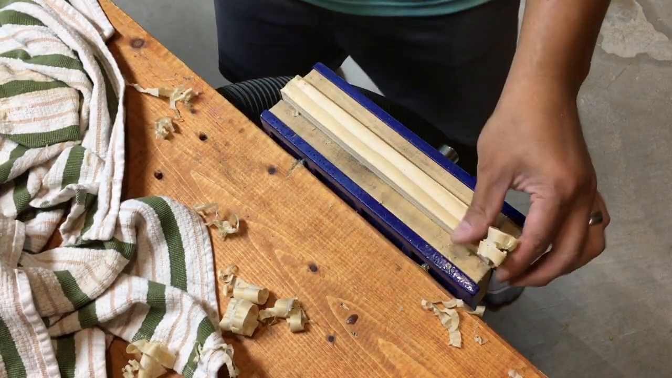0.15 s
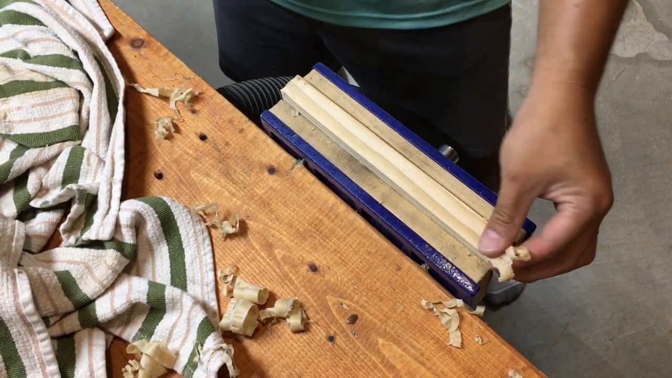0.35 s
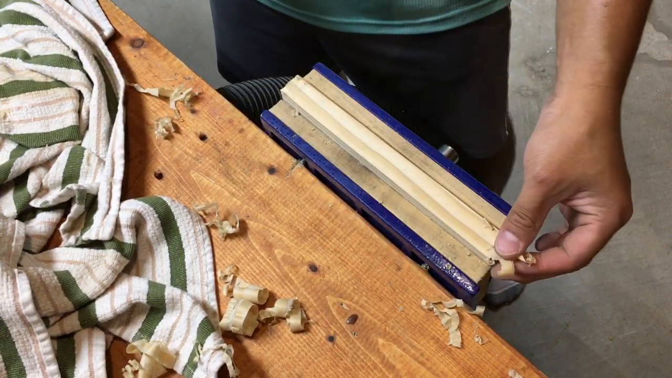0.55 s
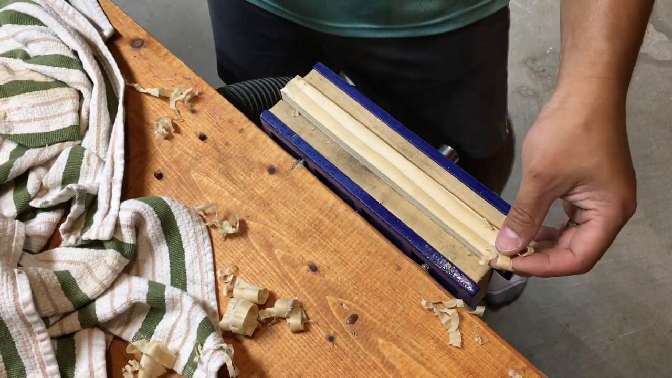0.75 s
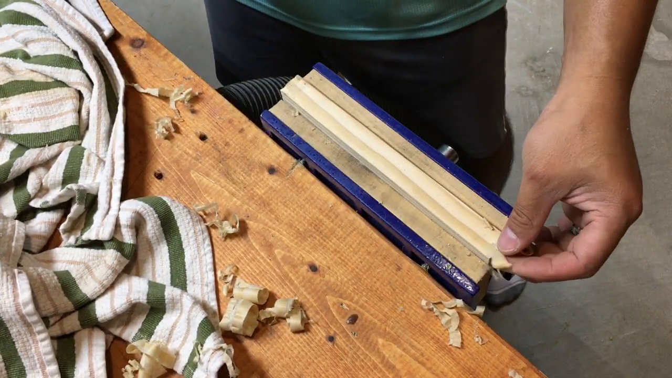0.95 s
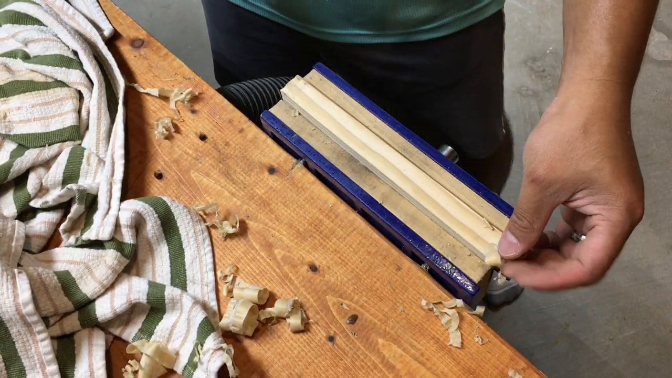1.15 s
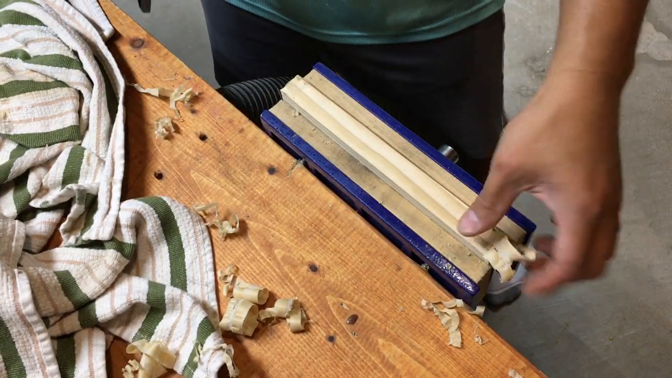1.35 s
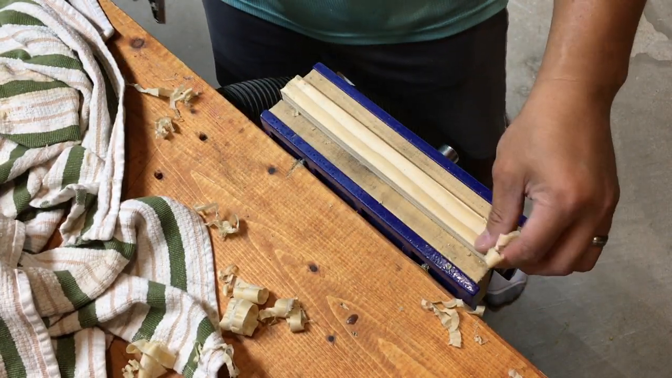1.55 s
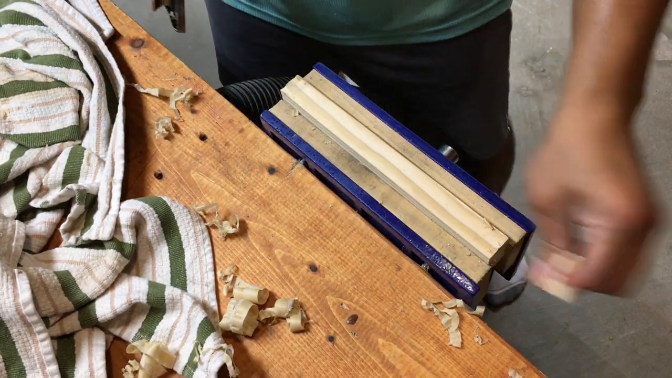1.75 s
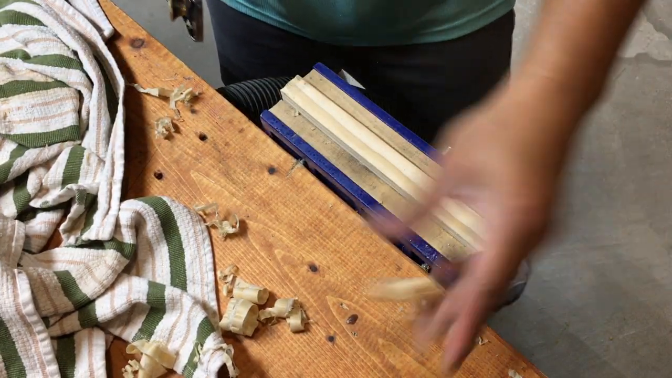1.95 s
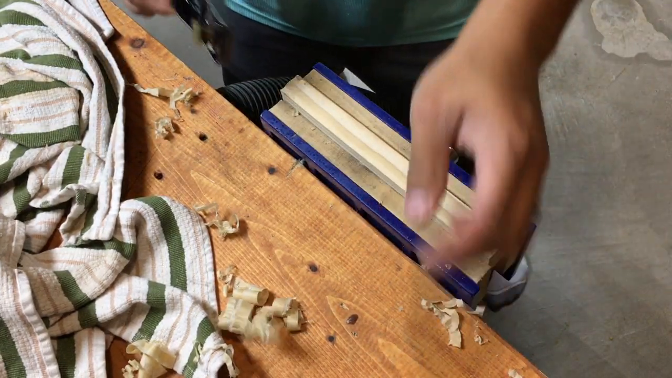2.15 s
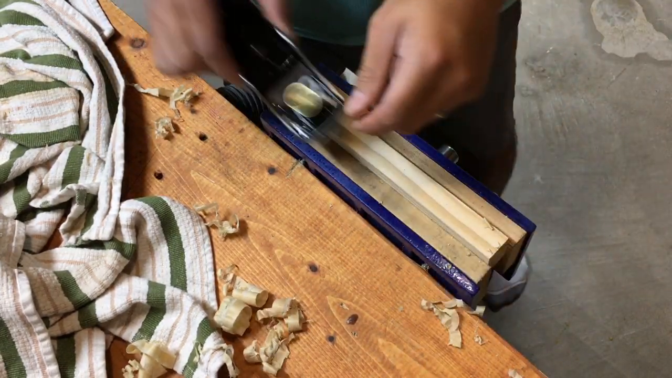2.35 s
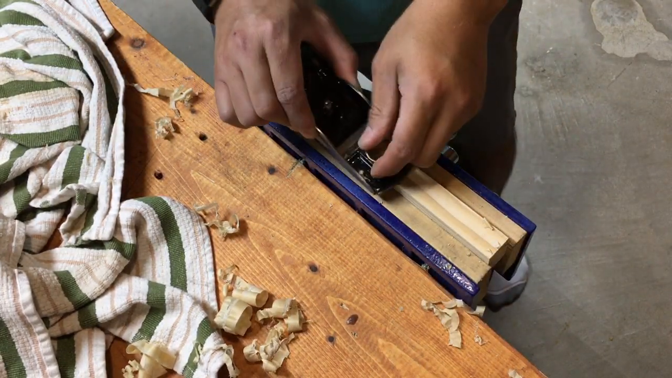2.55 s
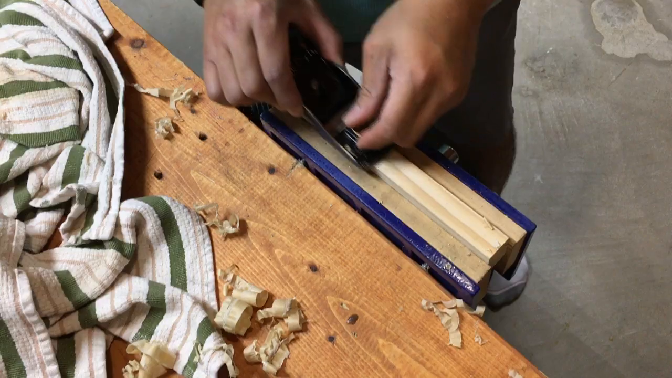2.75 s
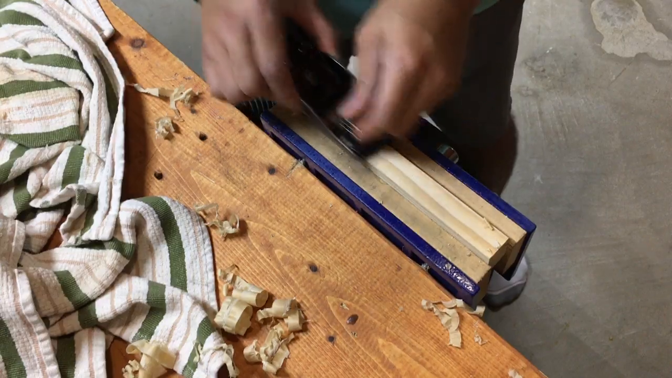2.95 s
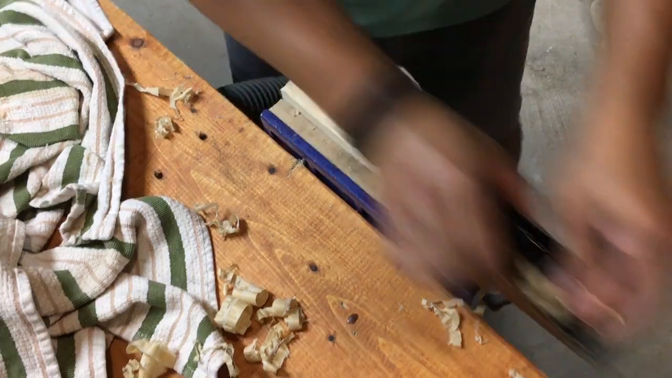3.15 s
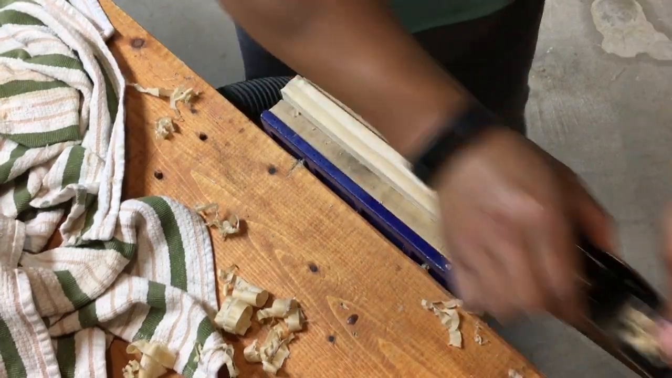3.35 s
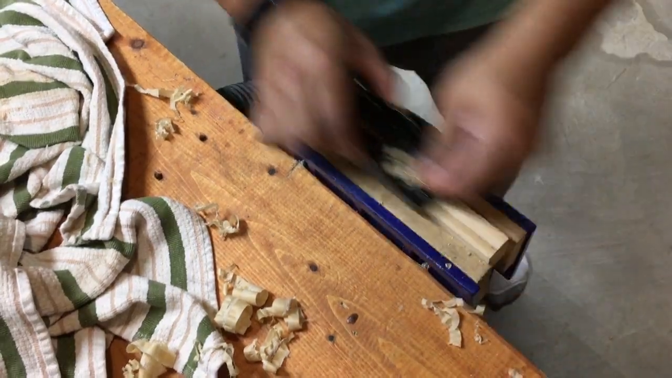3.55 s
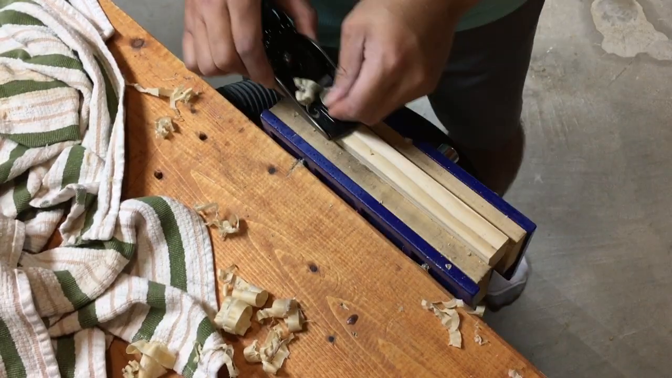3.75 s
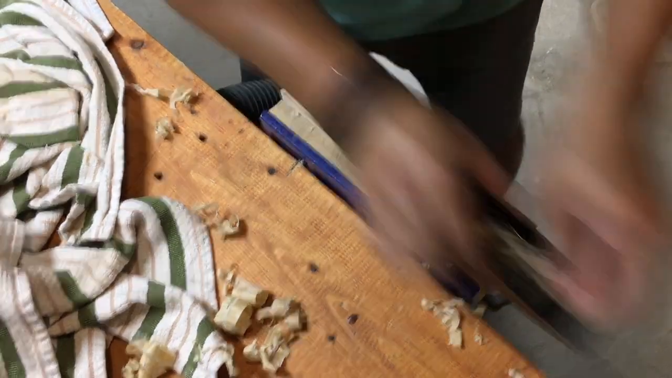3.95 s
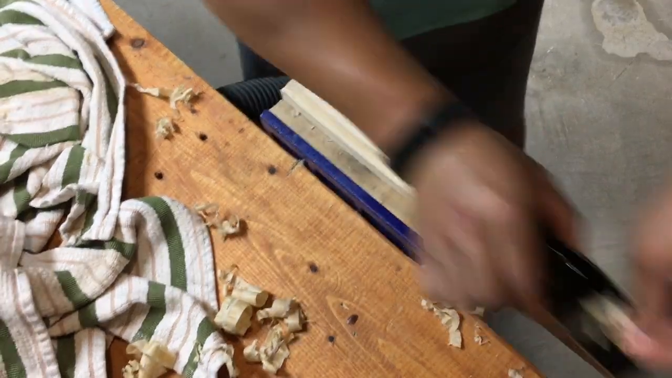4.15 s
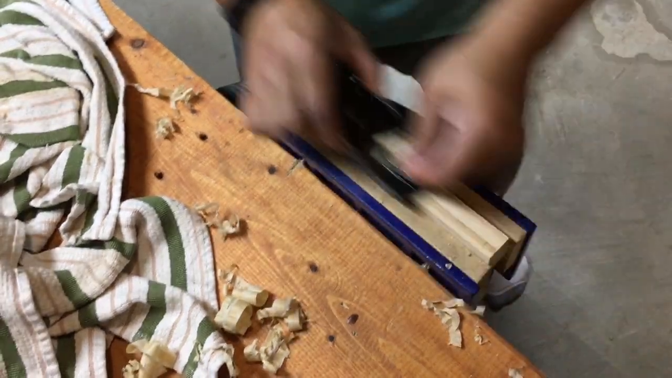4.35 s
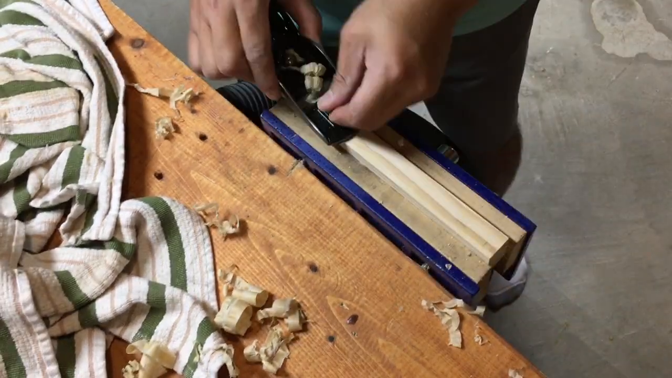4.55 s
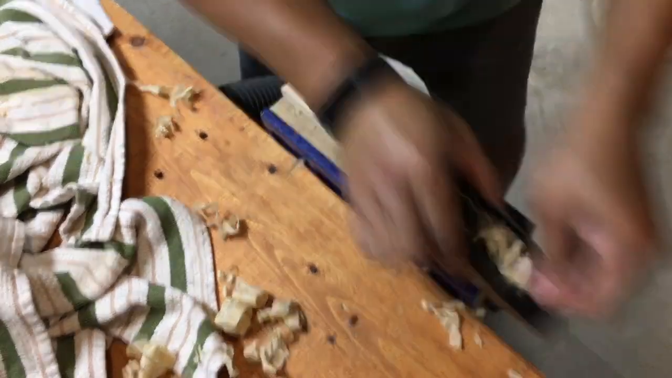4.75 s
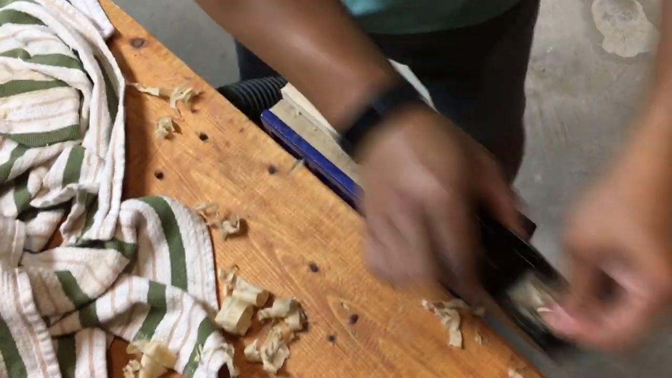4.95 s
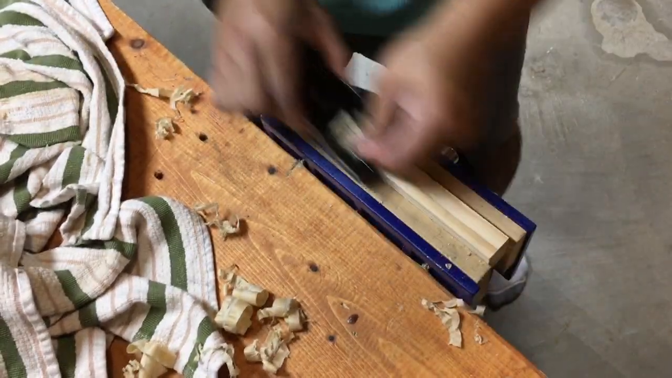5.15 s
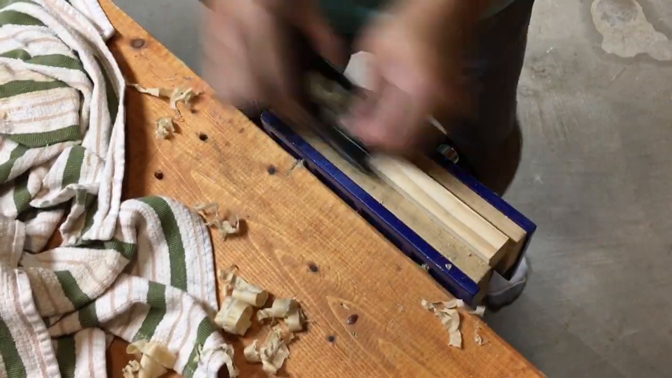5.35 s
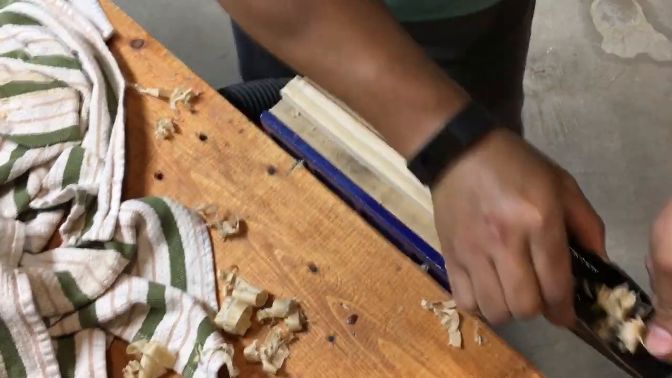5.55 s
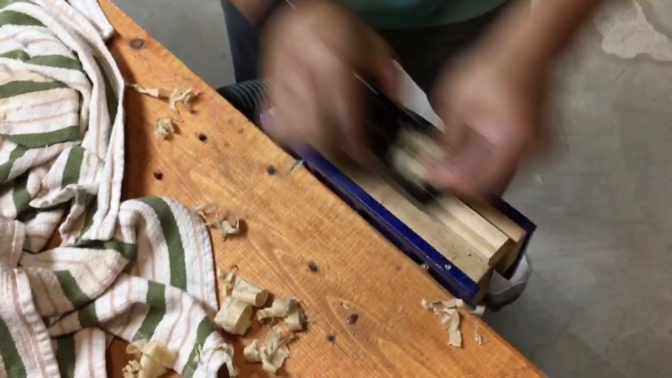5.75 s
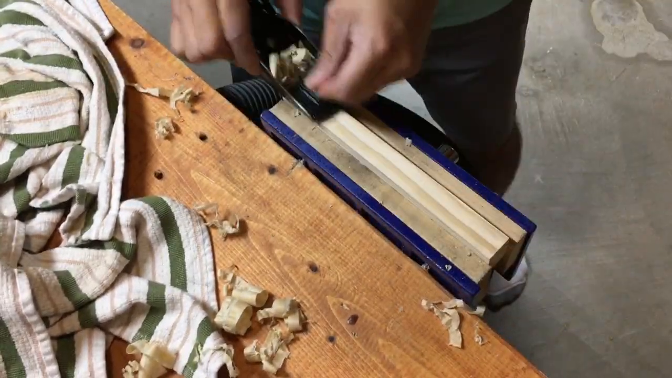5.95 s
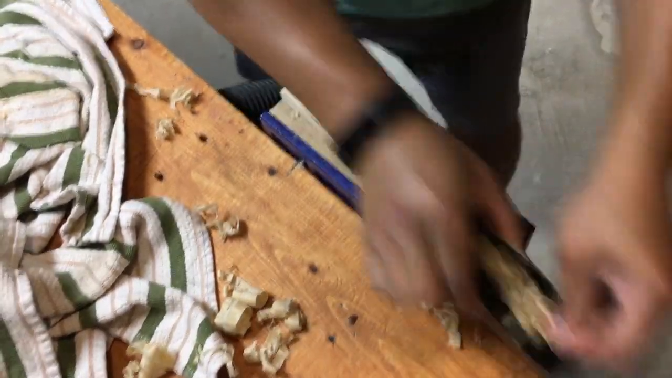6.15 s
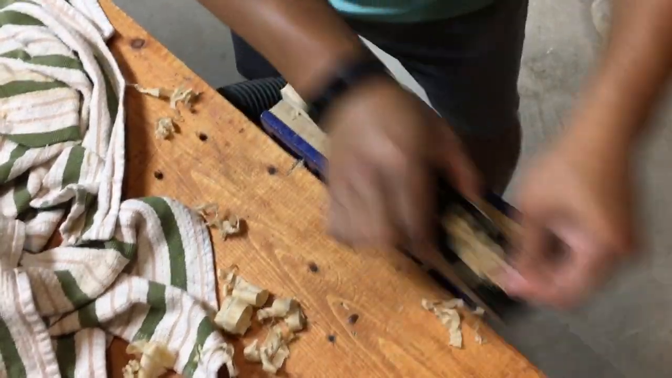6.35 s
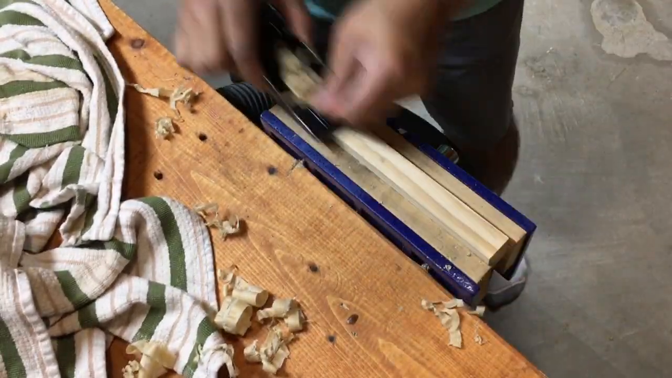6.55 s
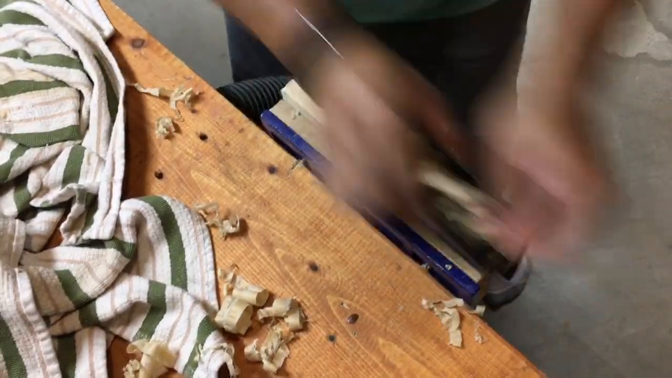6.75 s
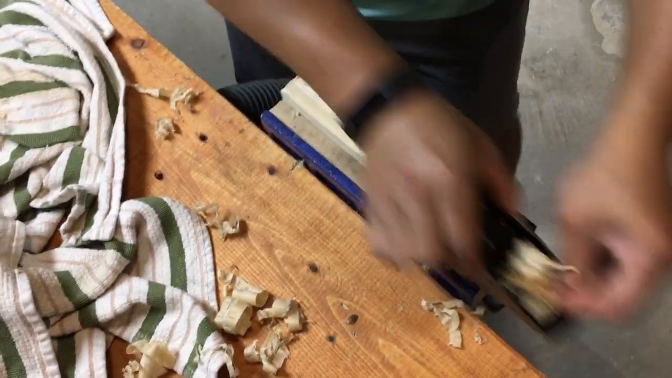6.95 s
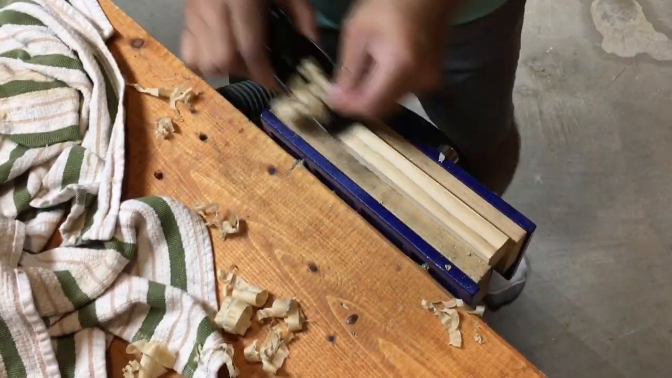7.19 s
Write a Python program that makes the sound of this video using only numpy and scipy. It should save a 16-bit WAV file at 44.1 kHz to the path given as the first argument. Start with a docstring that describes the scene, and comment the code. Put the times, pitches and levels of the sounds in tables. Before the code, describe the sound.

Fingers faintly rustle a dry wood shaving, then a metal hand plane clacks down and rasps along thin wooden strips in six quick pushes.

```python
"""Shaving and planing thin wooden strips

Fingers tease a shaving off thin wooden strips; then a metal hand plane is set down and pushed along them six times.
Rubbing and tearing are streams of random tiny fractures, coloured by the wood and the hollow throat of the plane.
Landings and run-offs ring decaying sine modes of the jig and the workbench; hard contacts crack and ring the iron.
Dense reflections of a small workshop and low, quiet air noise surround it, the same in both channels."""
import sys
import numpy as np
from scipy import signal
from scipy.fft import rfft, irfft
from scipy.io import wavfile
from scipy.ndimage import map_coordinates

SR = 44100
rng = np.random.default_rng(int(sys.argv[2]) if len(sys.argv) > 2 else 0)


def master(y):
    """Save y as 16-bit WAV."""
    cut = np.clip(np.atleast_2d(y).T, -1, 1)
    pcm = np.round(cut * 32767)  # scale
    wavfile.write(sys.argv[1], SR, pcm.astype(np.int16))


N = 318402
TIME = np.arange(N) / SR

# forward pushes: (start [s], run-off [s], time to gather speed [s], level [dB], shaking of the jig [dB])
PUSHES = [(3.002, 3.319, 0.079, -40.5, -45), (3.831, 4.065, 0.2, -31.5, -36),
          (4.642, 4.861, 0.17, -33.5, -34.5), (5.383, 5.566, 0.046, -35.5, -41),
          (6.035, 6.235, 0.067, -31, -37), (6.708, 6.893, 0.34, -26, -27)]
# the sole slides back over the strips: (start [s], turn [s], time to gather speed [s], level [dB],
# swell from start to end [dB], shaking of the jig [dB])
RETURNS = [(2.718, 2.966, 0.06, -59.5, 4, -49.5), (3.624, 3.832, 0.012, -47, -22, -41),
           (4.42, 4.614, 0.012, -48.5, -7, -42), (5.075, 5.375, 0.028, -47.5, 2.5, -39.5),
           (5.765, 6.027, 0.01, -41.5, -13.5, -41), (6.343, 6.713, 0.21, -44, -1, -40.5),
           (7.056, 7.301, 0.056, -38, 2.5, -47.5)]
RUN_OFF_S, TURN_S = 0.0037, 0.046  # a push ends at once; a return slows down to the turn
# resonances of the plane and its throat: (frequency [Hz], width [Hz], relative level [dB])
THROAT = [(3270, 500, 13.5), (4480, 450, 12), (6500, 500, 6.5), (8600, 900, 1), (11250, 650, 1.5),
          (13300, 600, -1)]
# spectrum of the jig: (frequency [Hz], level [dB])
JIG_COLOUR = [(110, -2), (165, -6), (205, -2), (245, 1), (350, -1.5), (470, -10.5), (650, -15.5),
              (900, -20.5), (1800, -51)]
# modes of the jig: (frequency [Hz], relative level [dB], t60 [s])
JIG_MODES = [(163.4, -8.5, 0.25), (240.8, -1, 0.13), (257.2, -2.5, 0.14), (309.8, -10, 0.32),
             (361.1, -7.5, 0.15), (421.3, -18, 0.14), (579, -18.5, 0.15), (666.6, -16, 0.12)]


def amp(db):
    """Decibels to gain."""
    return 10 ** (np.asarray(db) / 20)


def evened(x):
    """Scales to rms 1."""
    return x / np.sqrt(np.mean(x ** 2) + 1e-20)


def read(points, hz):
    """Reads a table on a log-frequency axis."""
    f, value = np.transpose(points)
    return np.interp(np.log(hz + 1), np.log(f + 1), value)


def add(mix, s, sound):
    """Mixes a sound in at s seconds."""
    part = mix[max(round(s * SR), 0):][:len(sound)]
    part += sound[:len(part)]


def bins(x):
    """The frequencies in a sound's spectrum."""
    return np.fft.rfftfreq(len(x), 1 / SR)


def coloured(x, points, gain=1):
    """Gives a sound a spectrum, times any further gain, at rms 1."""
    spectrum = rfft(x) * amp(read(points, bins(x))) * gain
    return evened(irfft(spectrum, len(x)))


def humps(hz, peaks, widen=1):
    """Power response of a few resonances; damping widens them."""
    power = 0
    for f, width, db in peaks:
        detune = 2 * (hz - f) / (width * widen)
        power = power + amp(db) ** 2 / (1 + detune ** 2) ** 2
    return power


def tilt(hz, slope_db):
    """Gain that slopes by so many dB an octave around 5 kHz, flat below 800 Hz."""
    return amp(slope_db * np.log2(np.maximum(hz, 800) / 5000))


def wobble(count, hz):
    """Random drift of rms 1, heading for a new value hz times a second."""
    knots = np.arange(count) * hz / SR
    return evened(np.interp(knots, np.arange(N // 8), rng.standard_normal(N // 8)))


def fibres(count, per_s, spread_db, clump_db, clump_hz):
    """Tiny fractures of uneven size at random moments, louder and softer in clumps."""
    sizes = amp(spread_db * np.minimum(rng.exponential(1, count), 4)) * rng.standard_normal(count)
    breaks = rng.random(count) < per_s / SR
    return sizes * breaks * amp(clump_db * wobble(count, clump_hz))


def stroke(start, end, rise_s, fall_s, swell_db=0):
    """Gain of one rubbing movement: it gathers speed, runs on under growing or easing pressure, and stops."""
    gain = np.zeros(N)
    t = np.arange(0, end - start, 1 / SR)
    speed = np.clip(t / rise_s, 0, 1) * np.clip((t[-1] - t) / fall_s, 0, 1)
    pressure = amp(swell_db * (t / t[-1] - .5))
    add(gain, start, speed ** 1.31 * pressure)  # rubbing grows with speed by this power
    return gain


def ring(modes, t, hold_s=0):
    """Modes kept going for hold_s, then dying; each blow shares its strength among them a little differently."""
    hz, db, t60 = np.transpose(modes)[:, :, None]
    size = amp(db + rng.uniform(-2, 2, db.shape))
    decay = amp(-60 * np.maximum(t - hold_s, 0) / t60)
    waves = size * decay * np.sin(2 * np.pi * (hz * t + rng.random(hz.shape)))
    return waves.sum(0) / np.linalg.norm(size)


def shimmer(x, patch_db, patch_hz, patch_s):
    """The grain under the tool keeps changing, so the colour of a rasp shifts in patches of pitch and time."""
    hz, t, z = signal.stft(x, SR, nperseg=512, noverlap=384)
    where = np.meshgrid(hz / patch_hz, t / patch_s, indexing="ij")
    patches = evened(map_coordinates(rng.standard_normal((256, 512)), where, order=1, mode="wrap"))
    return signal.istft(z * evened(amp(patch_db * patches)), SR, nperseg=512, noverlap=384)[1][:N]


def wandering(x, depth=.015, hz=20):
    """The hands and the curl shift on the moving plane, so its resonances drift up and down."""
    positions = np.cumsum(1 + depth * wobble(len(x), hz))
    return evened(map_coordinates(x, [positions], order=3, mode="wrap"))


def lingering(gain, fade_s):
    """The level of a body that stores the energy it is fed and loses it again."""
    keep = np.exp(-2 / (fade_s * SR))
    return np.sqrt(signal.lfilter([1 - keep], [1, -keep], gain ** 2) + 1e-20)


def room_air(air_db=-59.5):
    """The quiet air of the room: steady noise, mostly deep bass."""
    # (frequency [Hz], level [dB])
    air_colour = [(25, -41), (58, 17.5), (85, -2.5), (190, -11.5), (300, -6.5), (500, -22.5), (1500, -25.5),
                  (6500, -30.5), (16000, -35)]
    return amp(air_db) * coloured(rng.standard_normal(N), air_colour)


def workshop(x, first_s=0.00053):
    """Dense reflections from first_s on: decaying noise, each band dying at its own speed."""
    # reverberation of the workshop: (frequency [Hz], t60 [s])
    room_t60 = [(150, 0.43), (4000, 0.21), (15000, 0.13)]
    hz, t, z = signal.stft(rng.standard_normal(SR // 2), SR, nperseg=256)
    decay = amp(-60 * t / read(room_t60, hz)[:, None])
    tail = signal.istft(z * decay, SR, nperseg=256)[1]
    tail *= TIME[:len(tail)] > first_s
    return signal.fftconvolve(x, tail / np.linalg.norm(tail))[:N]


def leaning(lean_db=3, ease_s=0.038):
    """The hand presses on the jig and lets go: a soft, dull rumble."""
    # the hand leans on the jig: (start [s], end [s], relative level [dB])
    leans = [(0.047, 0.263, -54), (0.23, 0.652, -65), (1.01, 1.32, -64), (1.656, 1.87, -63),
             (2.404, 2.59, -60.5)]
    press = sum(amp(db) * stroke(start, end, ease_s, ease_s) for start, end, db in leans)
    # (frequency [Hz], level [dB])
    lean_colour = [(40, 2), (90, 9.5), (130, 6.5), (200, -7), (340, -6.0), (600, -30.5), (1500, -39)]
    return amp(lean_db) * press * coloured(rng.standard_normal(N), lean_colour)


def carrying(ease_s=0.033, swell_db=-5):
    """The curl in the plane brushes its sides as it is carried back: a faint, dry swish of noise."""
    # the plane is in the air between strokes: (start [s], end [s], level [dB])
    carries = [(4.06, 4.43, -67.5), (6.224, 6.44, -64), (6.88, 7.09, -55)]
    swing = sum(amp(db) * stroke(start, end, ease_s, ease_s, swell_db) for start, end, db in carries)
    # (frequency [Hz], level [dB])
    swish_colour = [(300, -6), (1000, 4.5), (3000, -1.5), (7000, -3.0), (16000, -28)]
    return swing * coloured(rng.standard_normal(N), swish_colour)


def handling(rise_share=0.099):
    """Grainy scuffs that swell and die away; the longer ones start more softly."""
    # dull scuffs as the plane is lifted, handled and bedded on the strips: (time [s], level [dB], fade [s])
    scuffs = [(2.631, -62, 0.016), (2.774, -51.5, 0.1), (3.337, -35, 0.023), (3.461, -50, 0.088),
              (3.626, -21, 0.02), (4.335, -45.5, 0.05), (4.423, -27, 0.012), (5.02, -43, 0.047),
              (5.21, -40, 0.03), (5.735, -41.5, 0.053), (5.768, -32.5, 0.024), (6.442, -42.5, 0.015),
              (6.523, -42, 0.054)]
    # (frequency [Hz], level [dB])
    scuff_colour = [(150, -1.5), (450, 5), (1000, -1.5), (3000, -18), (9000, -29.5)]
    out, t = np.zeros(N), TIME[:SR // 2]
    for s, db, fade_s in scuffs:
        grain = coloured(fibres(len(t), 9000, 1.5, 1.5, 200), scuff_colour)
        envelope = (1 - np.exp(-t / (rise_share * fade_s))) * np.exp(-t / fade_s)
        add(out, s, amp(db) * envelope * grain)
    return out


def shaving(crackle_db=-4, snap_db=-4, snap_s=0.0022, snap_rise_s=0.0022):
    """A fine rustle of fractures under the fingers, a looser crackle within it, and a few sharper snaps."""
    # the fingers draw the shaving along: (start [s], end [s], level [dB], swell from start to end [dB])
    pull_table = [(0.227, 0.32, -66.5, 5), (0.287, 0.52, -57.5, -11), (0.482, 0.837, -56, -2),
                  (0.815, 1.167, -55.5, -3.5), (1.204, 1.308, -55.5, 21), (1.498, 1.702, -58.5, 5),
                  (1.66, 1.815, -56.5, 9), (1.941, 2.039, -60, 1)]
    # the dry shaving snaps: (time [s], relative level [dB])
    snaps = [(0.3157, -32), (0.331, -35.5), (0.533, -29.5), (1.3425, -66), (1.659, -31), (1.696, -31),
             (1.726, -23.5), (1.744, -28), (1.782, -33.5), (2.0364, -43), (2.083, -41), (2.1988, -31),
             (2.33, -38.5)]
    # (frequency [Hz], level [dB])
    peel_colour = [(400, -12.5), (900, -12), (2000, -4), (2700, -11.5), (4000, -2), (4600, -3), (5200, -3),
                   (9600, -0.5), (16000, -9)]
    rustle = evened(fibres(N, 20000, 1.0, .8, 200))
    crackle = evened(fibres(N, 700, 4, 2, 40))
    ease_s = 0.032  # time to start and to stop a pull
    pulls = sum(amp(db) * stroke(start, end, ease_s, ease_s, swell_db) for start, end, db, swell_db in pull_table)
    catching = amp(3.06 * wobble(N, 44.48))  # the shaving catches and slips
    out = catching * pulls * coloured(rustle + amp(crackle_db) * crackle, peel_colour)
    t = TIME[:2048]
    for s, db in snaps:
        envelope = (1 - np.exp(-t / snap_rise_s)) * np.exp(-t / snap_s)
        add(out, s, amp(db + snap_db) * envelope * coloured(rng.standard_normal(len(t)), peel_colour))
    return out


def shaking():
    """How hard the pushes and the returns shake the jig."""
    pushes = sum(amp(shake_db) * stroke(start, end, rise_s, RUN_OFF_S)
                 for start, end, rise_s, _, shake_db in PUSHES)
    returns = sum(amp(shake_db) * stroke(start, end, rise_s, TURN_S)
                  for start, end, rise_s, _, _, shake_db in RETURNS)
    return pushes + returns


def bench_grumble(jig_db=-2, jig_fade_s=0.068, bench_fade_s=0.24, loose_db=-17, mode_db=6, mode_width_hz=28):
    """The jig grumbles in its modes under the moving plane, and the heavy bench rocks on for longer."""
    # (frequency [Hz], level [dB])
    bench_colour = [(22, -54), (38, 4.5), (52, 8), (62, 10), (75, 0.5), (92, -3), (120, 2.5), (190, -10),
                    (300, -42.5)]
    drive = shaking()
    rocking = lingering(drive, bench_fade_s)
    grumble = lingering(drive, jig_fade_s) + amp(loose_db) * rocking  # the rocking bench keeps the jig astir
    judder = rng.standard_normal(N)
    resonances = humps(bins(judder), [(hz, mode_width_hz, mode_db) for hz, _, _ in JIG_MODES])
    jig_noise = shimmer(coloured(judder, JIG_COLOUR, np.sqrt(1 + resonances)), 2.03, 78.8, .09)
    return amp(jig_db) * grumble * jig_noise + rocking * coloured(rng.standard_normal(N), bench_colour)


def thumps(thump_db=-2.0, rattle_db=-9, rattle_s=0.035, judder_s=0.02, rise_s=0.0026, boom_rise_s=0.014):
    """A blow judders and rattles on the jig and, building up more slowly, rings the heavy bench."""
    # the plane lands, knocks or runs off the end: (time [s], relative jig level [dB], bench boom [dB])
    blows = [(1.785, -49, -38.5), (2.636, -37.5, -28), (2.774, -19.5, -27), (3.239, -31, -18),
             (3.632, -15.5, -24.5), (4.049, -20.5, -20), (4.426, -19.5, -24), (4.858, -19, -16),
             (5.223, -24.5, -42), (5.559, -31, -23.5), (5.785, -22.5, -35), (5.82, -28, -31),
             (5.981, -28.5, -54), (6.076, -30, -23), (6.229, -36.5, -41), (6.775, -22.5, -26.5),
             (6.891, -28, -23.5)]
    # modes of the bench: (frequency [Hz], relative level [dB], t60 [s])
    bench_modes = [(52.4, -7.5, 0.75), (75.64, -6, 0.78), (102.5, -3, 0.29), (123.3, 4, 0.16)]
    out, t = np.zeros(N), TIME[:SR // 2]
    for s, db, boom_db in blows:
        rattle = amp(rattle_db) * np.exp(-t / rattle_s) * coloured(rng.standard_normal(len(t)), JIG_COLOUR)
        thump = (1 - np.exp(-t / rise_s)) * (ring(JIG_MODES, t, judder_s) + rattle)
        boom = (1 - np.exp(-t / boom_rise_s)) * ring(bench_modes, t)
        add(out, s, amp(db + thump_db) * thump)
        add(out, s, amp(boom_db) * boom)
    return out


def clacks(crack_s=0.0052, seat_s=0.00044):
    """Hard contacts: a brief crack, and a short ring of the iron that depends on where it is struck."""
    # iron knocks on wood: (time [s], level [dB], ring [Hz], brightness [dB per octave], relative ring level [dB])
    knocks = [(0.206, -51, 1960, -11.5, -6), (1.7986, -49.5, 2060, -5.5, -2), (2.427, -47, 2570, 5, 0),
              (2.4705, -50.5, 3930, 0, -1), (2.5277, -34.5, 3740, 3, 1.5), (2.637, -32.5, 3340, 6.5, -12),
              (2.774, -45.5, 1250, -5, -1), (3.3158, -30, 1520, -2, -2), (3.3365, -31, 1635, -4.5, -8),
              (3.6226, -23.5, 3066, -1.5, -1), (4.417, -30.5, 2815, 2, -1.5), (4.854, -18.5, 3640, -2, -23),
              (5.0198, -38.5, 1350, 2.5, 2.5), (5.097, -34.5, 3290, 5, -18), (5.2246, -31, 3320, 8, -20),
              (5.7129, -40, 1400, -7, -1), (5.7664, -29.5, 3240, 0.5, -13)]
    # modes of the iron: (multiple of the ring pitch [ratio], relative level [dB], t60 [s])
    iron_modes = [(1, -3, 0.048), (1.03, -21, 0.12), (1.62, -9.5, 0.029)]
    out, t = np.zeros(N), TIME[:8192]
    crack_colour = [(300, -11.5), (3400, 11.5), (5500, 3.5), (16000, -10.5)]  # (frequency [Hz], level [dB])
    for s, db, hz, bright_db, ring_db in knocks:
        blow = rng.standard_normal(len(t))
        crack = coloured(blow, crack_colour, tilt(bins(blow), bright_db)) * np.exp(-t / crack_s)
        iron = ring([(hz * ratio, mode_db, t60) for ratio, mode_db, t60 in iron_modes], t)
        add(out, s, amp(db) * (1 - np.exp(-t / seat_s)) * (crack + amp(ring_db) * iron))
    return out


def squeaking():
    """Stick and slip: a rough, unsteady tone that slides quickly and then settles around its last pitch."""
    # the shaving squeals: (time [s], length [s], first pitch [Hz], last pitch [Hz], level [dB])
    squeaks = [(4.034, 0.015, 3520, 3460, -25.5), (4.823, 0.014, 3280, 3480, -26),
               (5.476, 0.022, 3220, 3190, -29.5), (6.201, 0.0565, 2276, 1675, -37),
               (6.48, 0.019, 1340, 1580, -44.5)]
    out = np.zeros(N)
    for s, length, first_hz, last_hz, db in squeaks:
        count = int(length * SR)
        glide = last_hz + (first_hz - last_hz) * np.linspace(1, 0, count) ** 2
        hz = glide * (1 + .045 * wobble(count, 900))
        tone = np.sin(2 * np.pi * np.cumsum(hz) / SR) * amp(3 * wobble(count, 500))
        add(out, s, amp(db) * evened(tone) * signal.windows.tukey(count, .8))
    return out


def sliding(chirp_db=1):
    """The sole rubs back over the grain and sounds the hollow of the plane; it may chirp on landing."""
    # (frequency [Hz], level [dB])
    sole_colour = [(250, 14.5), (500, 1), (900, -1.5), (1600, 1.5), (2700, 1.5), (5200, -1.5), (8000, -0.5),
                   (11000, -3), (16000, -5)]
    # the sole chirps as it lands: (time [s], length [s], relative level [dB])
    chirps = [(3.634, 0.012, -33), (3.64, 0.02, -25), (4.426, 0.0094, -34.5), (5.787, 0.037, -38)]
    # resonances of a chirp: (frequency [Hz], width [Hz], relative level [dB])
    chirp_lines = [(6100, 400, -13.5), (8730, 230, -0.5), (14200, 600, -18)]
    out = np.zeros(N)
    for start, end, rise_s, db, swell_db, _ in RETURNS:
        rub = fibres(SR, 10000, 2.2, 2.3, 160)
        grip = rng.uniform(.985, 1.025)  # each new grip retunes the hollow a little
        hollow = np.sqrt(1 + humps(bins(rub) / grip, THROAT))
        rub = np.resize(wandering(coloured(rub, sole_colour, hollow)), N)
        out += amp(db) * stroke(start, end, rise_s, TURN_S, swell_db) * rub
    for s, length, db in chirps:
        slip = rng.standard_normal(4096)
        chirp = irfft(rfft(slip) * np.sqrt(humps(bins(slip), chirp_lines)))[:int(length * SR)]
        add(out, s, amp(db + chirp_db) * evened(chirp) * signal.windows.tukey(len(chirp), .7))
    return out


def chip_chatter(count, throat, colour, per_s=260, fade_s=0.0058):
    """The chip breaks at uneven intervals around per_s, and each break kicks the throat with a burst of noise."""
    breaks = np.cumsum(per_s * amp(3 * wobble(count, 200))) / SR + rng.random()
    kicks = np.exp(-(breaks % 1) / (per_s * fade_s)) * rng.standard_normal(count)
    return coloured(kicks, colour, np.sqrt(throat))


def cutting(throat_db=-7, bite_throat_db=-11, bite_widen=1.56, bite_db=-3.0, chatter_db=-8):
    """Fibres tear at the edge: louder as the plane gathers speed, and in bursts where the iron digs in."""
    # the iron digs in: (time [s], length [s], relative level [dB])
    bites = [(3.125, 0.1, -27), (3.226, 0.013, -27), (4.001, 0.0078, -20), (4.037, 0.019, -21),
             (4.727, 0.034, -32), (4.764, 0.03, -23), (4.819, 0.04, -20.5), (5.469, 0.038, -22),
             (5.51, 0.038, -18), (5.543, 0.013, -21.5), (6.072, 0.024, -28), (6.113, 0.047, -23),
             (6.17, 0.027, -17.5), (6.199, 0.032, -22), (6.768, .06, -25.5), (6.812, 0.083, -22.5)]
    # (frequency [Hz], level [dB])
    cut_colour = [(240, -4.5), (450, -4.5), (1200, -9.5), (2800, -8), (3300, -5), (4000, -5.5),
                  (6500, -3.5), (10000, -8), (16000, -12.5)]
    tear = fibres(N, 18000, 1.8, 1.0, 300) * amp(1.1 * wobble(N, 60))
    hollow = np.sqrt(1 + amp(throat_db) ** 2 * humps(bins(tear), THROAT))
    rasp = wandering(coloured(tear, cut_colour, hollow))
    out = rasp * sum(amp(db) * stroke(start, end, rise_s, RUN_OFF_S) for start, end, rise_s, db, _ in PUSHES)
    for s, length, db in bites:
        tear = fibres(4096, 14000, 1.6, 2.0, 450)
        hz = bins(tear)
        bright = 2.5 + 0.5 * (db + 21.5)  # dB an octave; a harder bite is brighter
        # the curl damps and retunes the throat
        throat = humps(hz / rng.uniform(.98, 1.1), THROAT, bite_widen)
        hollow = np.sqrt(1 + amp(bite_throat_db) ** 2 * throat)
        chatter = chip_chatter(len(tear), throat, cut_colour)
        bite = coloured(tear, cut_colour, tilt(hz, bright) * hollow) + amp(chatter_db) * chatter
        bite = bite[:int(length * SR)]
        add(out, s, amp(db + bite_db) * evened(bite) * signal.windows.tukey(len(bite), .35))
    return out


def scene(room_db=-11.5, bench_room_db=-13):
    """All the work at the bench, its reflections and the low air noise of the room."""
    rasps = shimmer(cutting() + sliding(), 2.8, 230, .026)
    rustle = shimmer(shaving(), 2, 500, .05)
    work = rustle + rasps + squeaking() + carrying() + clacks() + handling()
    thuds = bench_grumble() + thumps() + leaning()
    reflections = workshop(amp(room_db) * work + amp(bench_room_db) * thuds)
    mono = work + thuds + reflections + room_air()
    return np.array([mono, mono])


def record(dry, bass_hz=36, edge_hz=15780):
    """The microphone loses the deepest bass below bass_hz; then a steep band limit at edge_hz."""
    thinned = signal.sosfilt(signal.butter(4, bass_hz, "highpass", fs=SR, output="sos"), dry)
    band_limit = signal.firwin(511, edge_hz, window=("kaiser", 9), fs=SR)
    return signal.oaconvolve(thinned, band_limit[None], "same")


dry = scene()
out = record(dry)
master(out)
```